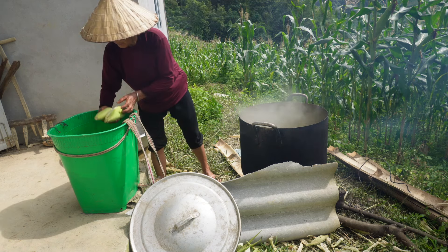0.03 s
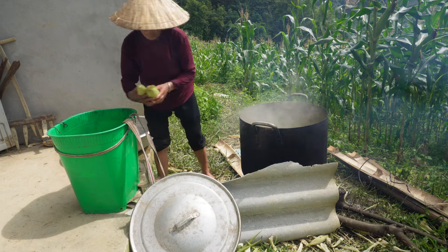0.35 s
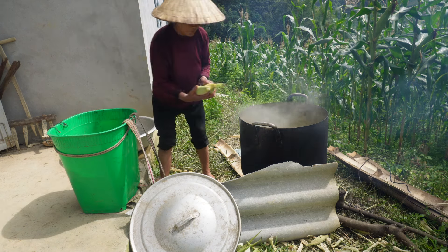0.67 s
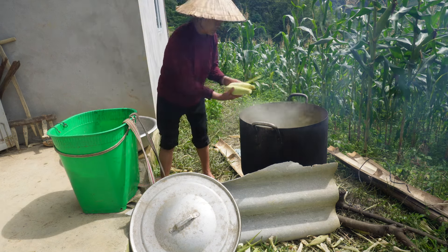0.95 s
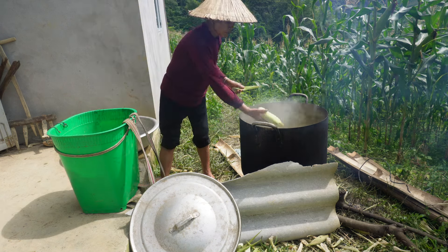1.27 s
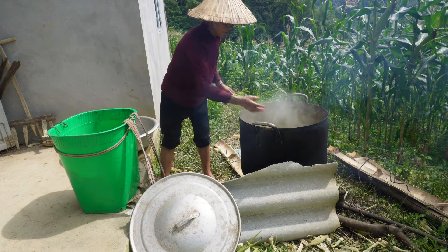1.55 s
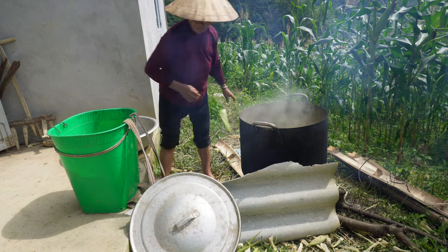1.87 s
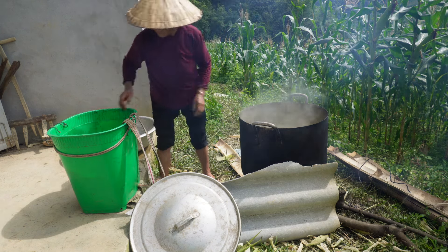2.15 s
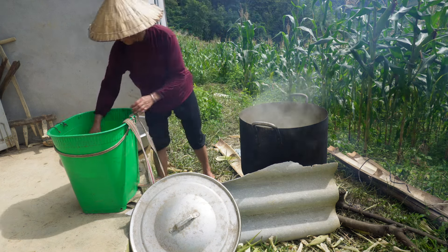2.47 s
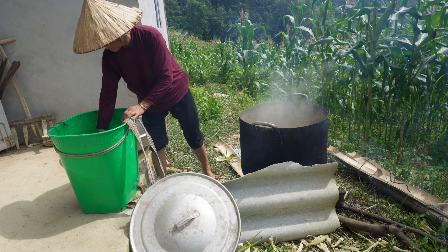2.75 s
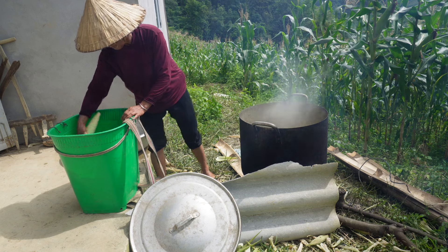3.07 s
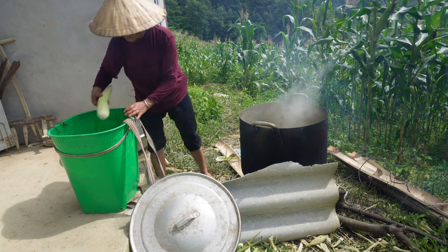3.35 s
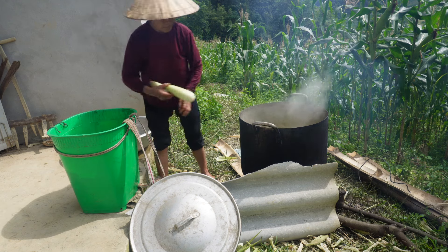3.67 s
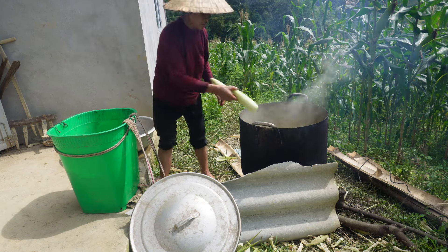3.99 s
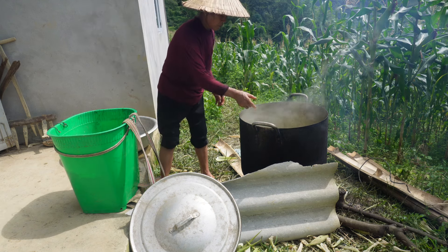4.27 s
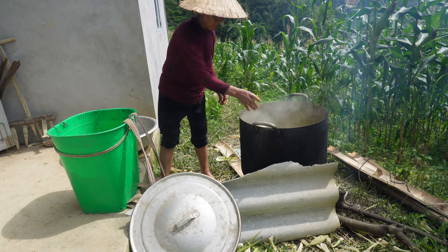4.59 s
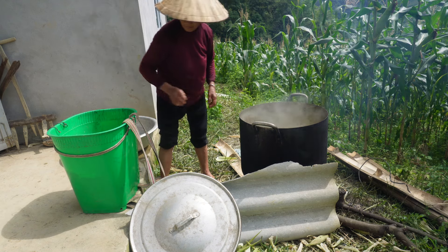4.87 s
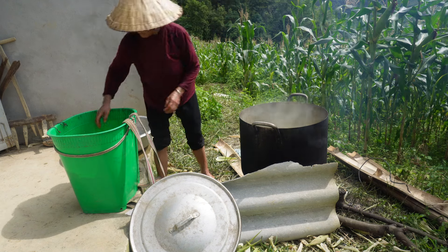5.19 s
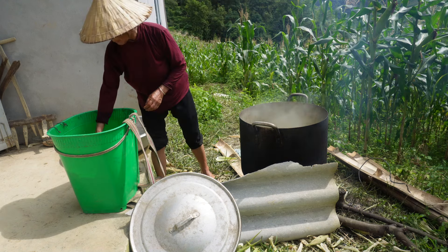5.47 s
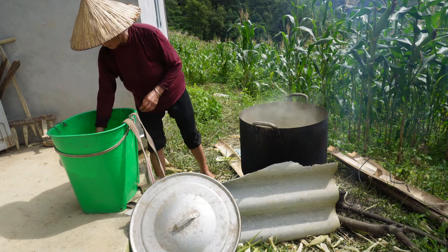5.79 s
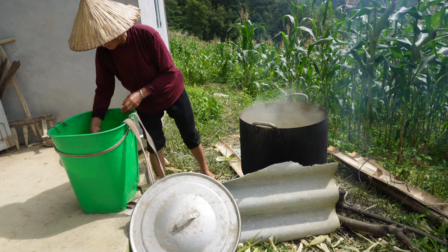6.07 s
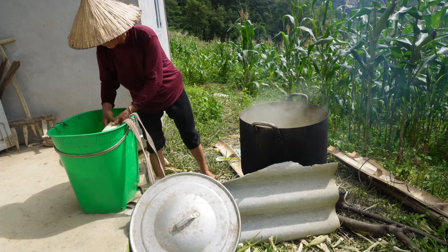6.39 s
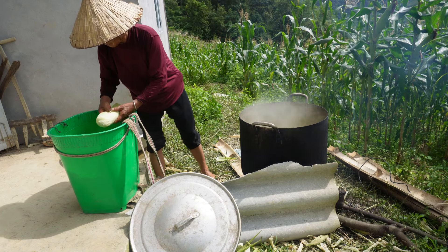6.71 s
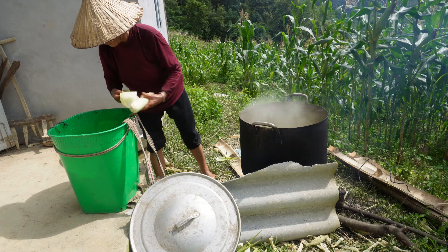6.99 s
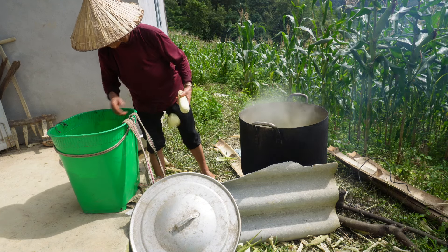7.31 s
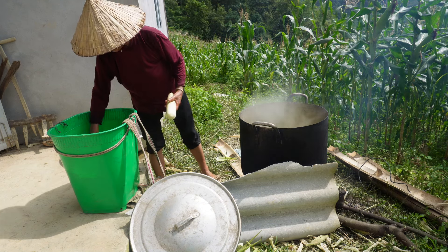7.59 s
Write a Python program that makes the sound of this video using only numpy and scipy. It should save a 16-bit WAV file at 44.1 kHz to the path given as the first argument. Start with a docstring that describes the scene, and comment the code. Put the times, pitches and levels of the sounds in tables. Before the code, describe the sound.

Beside a maize field, insects whine and chirp faintly over a soft, steady hiss of leaves, fire and simmering water. Close by, corn ears splash into a large pot in two quick groups, with a metal knock and a wooden clack between them. Afterwards more ears knock around in a plastic bucket, their husks rustling, and stalks crack and tear, loudest near the end.

```python
"""Ears of corn plunge into a big pot of hot water: smack, spray, bubbles, a gulp, a boom of the pot's
air and knocks on its metal. They come from a plastic bucket that thuds and clicks; husks rub and
crinkle, stalks crack and tear, and a loose board clacks. Behind are a steady hiss of leaves, fire and
simmering water, and insects whining and chirping in a maize field. A house wall echoes the near sounds."""
import sys
import numpy as np
from scipy import signal
from scipy.fft import rfft, irfft, next_fast_len
from scipy.io import wavfile

SR = 44100
rng = np.random.default_rng(int(sys.argv[2]) if len(sys.argv) > 2 else 0)


def store_pcm(level_fs):
    """Save levels as 16-bit WAV."""
    pcm = np.round(np.clip(level_fs, -1, 1) * 32767).astype(np.int16)
    wavfile.write(sys.argv[1], SR, np.atleast_2d(pcm).T)


N = 337385
TIME_S = np.arange(N) / SR
SIDES = np.array([[1], [-1]])   # left, right


def from_db(db):
    """Decibels to gain."""
    return 10 ** (np.asarray(db) / 20)


def unit_rms(x):
    """Scale to rms 1."""
    return x / np.sqrt(np.mean(x ** 2) + 1e-20)


def curves(rows):
    """One piecewise-linear curve per column after the time."""
    times_s, *columns = np.transpose(rows)
    return [np.interp(TIME_S, times_s, column) for column in columns]


def drift(per_s):
    """Random curve, rms 1, with per_s new values a second."""
    return unit_rms(np.interp(TIME_S * per_s, np.arange(30000), rng.standard_normal(30000)))


def grit(grain_db, per_s):
    """Noise in tiny clumps of uneven size, rms 1."""
    return unit_rms(rng.standard_normal(N) * from_db(grain_db * np.clip(drift(per_s), -2, 2)))


def cut(x, hz, kind, order=2):
    """Butterworth low- or high-pass."""
    sos = signal.butter(order, np.clip(hz, 10, .45 * SR), kind, fs=SR, output="sos")
    return signal.sosfilt(sos, x + 1e-18)


def resonate(x, hz, width_hz):
    """One resonance; keeps the power of white noise."""
    b, a = signal.iirpeak(min(hz, .45 * SR), hz / min(width_hz, SR / 3), fs=SR)
    return signal.lfilter(b, a, x + 1e-18) / np.sqrt(b[0])


def body(x, modes):
    """Parallel resonances of alternating sign."""
    weights = [from_db(db) * np.sqrt(width) * (-1) ** k for k, (_, width, db) in enumerate(modes)]
    weights = np.array(weights) / np.linalg.norm(weights)
    return sum(weight * resonate(x, hz, width) for weight, (hz, width, _) in zip(weights, modes))


def colour(x, spectrum, size=4096):
    """Minimum-phase filter of the given spectrum; keeps the power of white noise."""
    hz, db = np.transpose(spectrum)
    grid_hz = np.maximum(np.arange(size // 2 + 1) * SR / size, 1)
    gain = from_db(np.interp(np.log(grid_hz), np.log(hz), db))
    cepstrum = irfft(np.log(gain))
    cepstrum[1:size // 2] *= 2
    response = irfft(np.exp(rfft(cepstrum[:size // 2], size)))
    return signal.fftconvolve(x, response / np.linalg.norm(response))[:N]


def swell(s, rise_s, t60_s, db):
    """Envelope: exponential rise to a peak at time s, then decay."""
    span = slice(max(int((s - 8 * rise_s) * SR), 0), int((s + 2 * t60_s) * SR))
    age_s, out = TIME_S[span] - s, np.zeros(N)
    out[span] = from_db(db) * np.exp(np.minimum(age_s / rise_s, -age_s * np.log(1000) / t60_s))
    return out


def bell_curves(rows, half_s):
    """One Gaussian envelope per row."""
    out = np.zeros(N)
    for s, db in rows:
        span = slice(max(int((s - 3 * half_s) * SR), 0), int((s + 3 * half_s) * SR))
        out[span] += from_db(db) * np.exp(-((TIME_S[span] - s) / half_s) ** 2)
    return out


def clicks(rows):
    """One impulse per row."""
    out = np.zeros(N)
    for s, db in rows:
        out[round(s * SR)] += from_db(db)
    return out


def strokes(rows, source, shape):
    """Each row (s, rise_s, t60_s, db, hz) swells the source and filters it by shape(x, hz)."""
    out = np.zeros(N)
    for *stroke, hz in rows:
        envelope = swell(*stroke)
        on = envelope > 0
        out[on] += shape(source[on] * envelope[on], hz)
    return out


def hollow_notes(rows, waver, churn, sharp=0, settle_s=0.014):
    """Air resonances: wavering damped sines plus churning noise, optionally sharp around the peak."""
    wobble = 1 + waver * drift(70)
    noise = rng.standard_normal(N)
    notes = np.zeros(N)
    for s, hz, rise_s, t60_s, db in rows:
        envelope = swell(s, rise_s, t60_s, db)
        on = envelope > 0
        pitch_hz = hz * wobble[on] * (1 + sharp * np.exp(-np.abs(TIME_S[on] - s) / settle_s))
        tone = np.sqrt(2) * np.sin(2 * np.pi * np.cumsum(pitch_hz) / SR)
        rough = cut(resonate(noise[on], hz, 0.53 * hz), 0.51 * hz, "high")
        notes[on] += envelope[on] * (tone + churn * rough)
    return notes


def widen(mid, side, above_hz, side_db):
    """Stereo: alike in the bass, different in the treble."""
    return mid + from_db(side_db) * cut(side, above_hz, "high", order=1) * SIDES


def yard(x, t60_s, tail_db, wall_s, wall_db, dull_hz, left_lead_samples, side_db):
    """Direct sound, a smeared wall echo and a thin tail from the plants, which scatter little bass."""
    age_s = TIME_S[:SR // 2]
    scatter = rng.standard_normal((2, len(age_s)))
    tail = scatter * np.exp(-age_s * np.log(1000) / t60_s) * (age_s > .004)
    tail = cut(tail, dull_hz, "low", order=1)
    echo = scatter * np.exp(-np.abs(age_s - wall_s) / 0.0015)
    tail *= from_db(tail_db) / np.linalg.norm(tail[0])
    echo *= from_db(wall_db) / np.linalg.norm(echo[0])
    mid, side = tail + echo
    response = cut(widen(mid, side, above_hz=4300, side_db=side_db), 370, "high", order=1)
    size = next_fast_len(N + SR // 10, real=True)
    shift = np.exp(1j * np.pi * left_lead_samples * np.arange(size // 2 + 1) / size * SIDES)
    direct = irfft(rfft(x, size) * shift, size)[:, :N]
    return direct + signal.fftconvolve(x[None], response, axes=1)[:, :N]


# hiss spectrum (frequency [Hz], relative density [dB])
HISS_SPECTRUM = [(30, -44), (100, -27), (180, -22), (420, -12), (620, -7.5), (900, -2), (1700, -4),
                 (3700, -4), (4900, -5), (6600, -8.5), (8200, -6), (9400, -14), (11200, -13.5),
                 (12500, -18), (16000, -20.5)]


def hiss(level_db=-57):
    """Even noise of leaves, fire and simmering water."""
    mid, side = (colour(grit(grain_db=1.0, per_s=95), HISS_SPECTRUM) for _ in range(2))
    return from_db(level_db + .5 * drift(2)) * unit_rms(widen(mid, side, above_hz=360, side_db=-5.5))


def insect_band(hz, width_hz):
    """Far stereo buzz: random flutter blurs a pitch into a band; rms 1."""
    phase = 2 * np.pi * np.cumsum(hz * np.ones(N)) / SR
    flutter_per_s = 1.5 * width_hz
    mid, side = (drift(flutter_per_s) * np.cos(phase) + drift(flutter_per_s) * np.sin(phase)
                 for _ in range(2))
    return unit_rms(widen(mid, side, above_hz=2000, side_db=-5))


# cicada whine (time [s], pitch [Hz], level [dB])
CICADA_WHINE = [(0, 8240, -67), (1.5, 8210, -67), (2.5, 8150, -71.5), (3.5, 8590, -63.5), (4.1, 8590, -60),
                (5.6, 8690, -61), (6.5, 8720, -62), (7.65, 8570, -62)]


def cicada(throb_hz=67, throb_depth=0.5):
    """A narrow throbbing whine over a broader, lower band."""
    hz, db = curves(CICADA_WHINE)
    rate_hz = throb_hz * (1 + 0.0029 * drift(5))
    throb = 1 + throb_depth * np.cos(2 * np.pi * np.cumsum(rate_hz) / SR)
    return from_db(db) * (throb * insect_band(hz, 120) + from_db(-6) * insect_band(hz - 300, 800))


# cricket loudness (time [s], level [dB])
CRICKET_LEVELS = [(0, -60), (.14, -60), (.3, -69), (.75, -72), (1.3, -67.5), (2.2, -74), (3.3, -68),
                  (3.8, -70), (7.65, -72)]


def bush_cricket(pulses_per_s=16.6):
    """Fast, slightly uneven pulses in two very high bands."""
    uneven_s = TIME_S - .012 + 0.0031 * drift(6)
    pulses = np.cos(np.pi * pulses_per_s * uneven_s) ** 2 * from_db(0.74 * drift(4.3))
    buzz = insect_band(10920, 880) + from_db(2) * insect_band(9600, 900)
    return from_db(curves(CRICKET_LEVELS)[0]) * pulses * buzz


# far insect whistles (time [s], level [dB])
WHISTLE_CALLS = [(.62, -60.5), (1.46, -62), (3.66, -58.5), (5.54, -61), (6.27, -58.5)]


def whistles():
    """Thin narrow-band calls that fade in and out."""
    return bell_curves(WHISTLE_CALLS, half_s=0.08) * insect_band(hz=4950, width_hz=160)


# far insect chirps (time [s], level [dB])
CHIRP_CALLS = [(.235, -50), (.537, -47.5), (0.863, -47.5), (1.18, -52), (2.33, -49), (2.52, -52),
               (2.76, -54.5), (3.0, -47.5), (3.35, -54.5), (3.545, -46), (4.548, -37.5), (5.03, -43),
               (6.87, -48), (7.17, -46)]


def chirps():
    """Short rasps: a fluttering band with a pitched core."""
    flutter = from_db(-2 + drift(120))
    rasp = insect_band(4365, 800) + from_db(-7.5) * insect_band(4500, 220)
    return bell_curves(CHIRP_CALLS, half_s=0.042) * flutter * rasp


# board clacks (time [s], rise [s], t60 [s], level [dB])
BOARD_CLACKS = [(2.084, 0.001, 0.038, -25), (2.1, 0.0038, 0.16, -37.5), (2.146, .0005, 0.0075, -25)]
# board modes (frequency [Hz], width [Hz], relative gain [dB])
BOARD_MODES = [(1900, 260, 0.5), (2780, 260, 6.5), (3170, 370, -1), (4300, 440, -2), (6200, 300, -11),
               (6900, 630, -9.5)]


def board():
    """A light slat claps down and bounces."""
    contact = grit(grain_db=5.0, per_s=1100) * sum(swell(*clack) for clack in BOARD_CLACKS)
    return cut(body(contact, BOARD_MODES), 1100, "high")


# husk rubs (time [s], rise [s], level [dB], centre [Hz], tip crinkle [dB])
HUSK_RUBS = [(.675, 0.028, -49, 3600, -72), (1.0, 0.088, -57, 2920, -59), (1.111, 0.0036, -52.5, 4870, -60),
             (3.0, 0.091, -57, 2280, -77), (3.09, 0.032, -47, 2530, -40), (3.852, 0.008, -44, 2300, -40),
             (4.86, 0.22, -49, 2800, -49.5), (5.414, 0.13, -49.5, 1760, -43.5),
             (5.558, 0.018, -46.5, 1840, -56), (5.765, .002, -52, 2230, -74), (5.97, 0.038, -45, 2600, -71),
             (6.117, 0.041, -34, 2300, -32), (6.31, 0.044, -54, 2780, -55), (6.518, 0.0014, -51, 1350, -79),
             (6.745, 0.015, -38, 4460, -62), (6.92, .015, -45, 5600, -50), (7.03, 0.27, -50, 4300, -42.5),
             (7.598, 0.0026, -40.5, 2300, -38)]
# husk-on-husk spectrum (frequency [Hz], relative gain [dB])
HUSK_SPECTRUM = [(500, -3), (1000, 0.5), (1500, 2), (2300, 1.5), (3300, 1), (4300, 1), (5700, 1.5),
                 (7500, -1.5), (15000, -11)]


def husks(cracks_per_s=370):
    """Ribbed leaves slip in fine grains; their dry tips crackle higher and longer."""
    slips, flexing = [], 0
    for s, rise_s, db, hz, crinkle_db in HUSK_RUBS:
        t60_s = 0.17 + 2.25 * rise_s   # slow strokes die slowly
        slips.append((s, rise_s, t60_s, db, hz))
        flexing += swell(s, rise_s, 1.78 * t60_s, crinkle_db)
    friction = grit(grain_db=3.0, per_s=500)
    rubs = strokes(slips, friction, lambda x, hz: cut(resonate(x, hz, 0.83 * hz), 0.093 * hz, "high"))
    tips = unit_rms((rng.random(N) < cracks_per_s / SR) * rng.standard_normal(N))
    crinkle = (1.22 * grit(grain_db=2.5, per_s=850) + 0.88 * tips) * flexing
    return colour(rubs, HUSK_SPECTRUM) + from_db(-6.5) * cut(crinkle, 5100, "high")


# stalk breaks (time [s], thin fibres [dB], thick core [dB], tear [dB])
STALK_SNAPS = [(3.954, -36.5, -45, -47), (4.143, -40, -58, -74), (5.168, -43, -61, -60),
               (5.213, -18.5, -40, -43), (5.3651, -22.5, -55, -50), (6.045, -30.5, -56, -47),
               (6.223, -42, -52, -72), (6.274, -35, -51, -72), (6.318, -38, -56, -68),
               (6.8935, -16, -15, -44), (7.2616, -7.5, -1.5, -19.5)]


def stalks(fibre_hz=13200, core_hz=7050, tear_hz=7230, cob_knock_hz=1090, cob_tear_hz=2600):
    """Fibres and core crack together, then tear; the cob passes on crack and tear, lower down."""
    breaks, knocks = [], []
    for s, fibre_db, core_db, tear_db in STALK_SNAPS:
        fibre = (s, 0.00045, 0.016)   # (time [s], rise [s], t60 [s])
        core = (s, 0.0001, 0.015)
        tear = (s + 0.029, 0.016, 0.1)
        breaks += [(*fibre, fibre_db, fibre_hz), (*core, core_db, core_hz), (*tear, tear_db, tear_hz)]
        knocks += [(*core, 2 * core_db - 15.5, cob_knock_hz), (*tear, tear_db - 11, cob_tear_hz)]
    crackle = grit(grain_db=4.5, per_s=1700)
    cracks = strokes(breaks, crackle, lambda x, hz: resonate(x, hz, 0.25 * hz) + from_db(-7.5) * x)
    cob = strokes(knocks, crackle, lambda x, hz: resonate(x, hz, 2.2 * hz))
    return cut(cracks, 5180, "high", order=6) + cut(cob, 260, "high")


# ears rubbing and landing in the bucket (time [s], rise [s], relative level [dB], centre [Hz])
BUCKET_THUDS = [(2.872, 0.0026, -60, 420), (5.386, .021, -45, 490), (5.57, .027, -51.5, 537),
                (6.129, 0.032, -35.5, 615), (6.229, .012, -49.5, 474), (6.285, .004, -37, 250),
                (7.172, 0.069, -47, 438), (7.249, .02, -45, 376), (7.31, 0.048, -33.5, 427)]
# wall and air modes (frequency [Hz], width [Hz], relative gain [dB])
BUCKET_MODES = [(172, 9, 1.5), (373, 140, 0.5), (426, 140, 2), (760, 123, -1.5), (866, 190, 1),
                (1410, 630, 3)]


def bucket_thuds(wall_t60_s=0.25, air_hz=180, air_t60_s=0.095):
    """Soft ears drum on the plastic wall and wake the air inside."""
    def soft_touch(x, hz):
        return cut(resonate(x, hz, 0.64 * hz) * np.sqrt(hz / SR), 2.5 * hz, "low")

    wall = unit_rms(body(grit(grain_db=1.5, per_s=190), BUCKET_MODES))
    pushes = [(s, rise_s, wall_t60_s, db + 12, hz) for s, rise_s, db, hz in BUCKET_THUDS]
    notes = [(s, air_hz, rise_s, air_t60_s, db - 22) for s, rise_s, db, _ in BUCKET_THUDS]
    # an ear pulled out bumps along the wall, ever lower and softer
    bumps = [(3.193 + k * .057, 215.3 - k * 5.47, 0.023, 0.086, -50 - k * 3) for k in range(6)]
    air = hollow_notes(notes + bumps, waver=0.081, churn=0.43)
    return strokes(pushes, wall, soft_touch) + cut(air, 630, "low")


# taps on the bucket (time [s], level [dB])
BUCKET_TAPS = [(5.451, -22), (5.474, -25), (5.949, -10), (5.963, -13), (5.981, -13), (6.0435, -29),
               (6.0825, 4), (6.518, -22), (6.948, -14)]
# stiff wall modes (frequency [Hz], width [Hz], relative gain [dB])
PLASTIC_MODES = [(1350, 360, 0.5), (2300, 310, 3), (3200, 180, 9), (4040, 380, 6.5), (5300, 1000, -2),
                 (9000, 2200, -13)]


def bucket_taps():
    """Hard ends of the ears click on the quickly damped plastic."""
    return body(clicks(BUCKET_TAPS), PLASTIC_MODES)


# knocks on the pot (time [s], rise [s], t60 [s], relative level [dB], centre [Hz])
POT_KNOCKS = [(1.8186, 0.0016, 0.04, -10.5, 3350), (1.831, 0.0019, 0.12, -14, 4500),
              (1.857, 0.0089, 0.41, -31.5, 1800)]
# pot modes (frequency [Hz], width [Hz], relative gain [dB])
POT_MODES = [(820, 2700, -15), (1470, 180, -5), (1720, 280, -10.5), (2430, 530, -5), (2960, 140, -3),
             (3260, 360, -3.5), (3850, 140, 3.5), (4240, 66, 6), (4560, 130, 1.5), (5050, 510, -6.5),
             (7000, 520, -5.5), (9150, 180, -7), (11350, 1100, -14.5)]


def pot():
    """Short noisy contacts ring the water-damped metal."""
    contact = grit(grain_db=0.0, per_s=950)
    knocks = sum(resonate(contact * swell(*stroke), hz, 1.5 * hz) for *stroke, hz in POT_KNOCKS)
    return from_db(-5.5) * body(knocks, POT_MODES)


def bubbles(per_s, low_hz, high_hz, cycles, sizes=13):
    """Bubbles of random size, each ringing for some cycles; rms 1."""
    births = (rng.random(N) < per_s / SR) * rng.standard_normal(N)
    size = rng.integers(0, sizes, N)
    pitches_hz = np.geomspace(low_hz, high_hz, sizes)
    rings = (resonate(births * (size == k), hz, 2 * hz / cycles) for k, hz in enumerate(pitches_hz))
    return unit_rms(sum(rings))


# ears hitting the water (time [s], rise [s], splash [dB], smack [dB], high-pass [Hz], spray t60 [s],
# froth [dB], gulp [dB], boom [dB])
EAR_PLUNGES = [(1.533, 0.00059, -21, -16, 1230, 0.4, -42, -55, -41),
               (1.6035, .006, -18, -5.5, 500, 0.2, -28, -39, -57),
               (1.667, .001, -21, 1, 500, 0.5, -41, -40.5, -52),
               (4.2939, .0008, -41, -8.5, 1800, .1, -50, -64, -47),
               (4.303, .001, -29, -21, 1200, 0.52, -35.5, -61, -60),
               (4.3847, 0.0046, -14.5, 4.5, 600, 0.24, -42.5, -28, -48),
               (4.736, 0.0031, -11.5, 2, 1780, 0.18, -46.5, -45.5, -46)]
# single large bubbles (time [s], pitch [Hz], level [dB])
LARGE_BUBBLES = [(4.312, 1900, -26.5), (4.333, 1363, -31.5), (4.342, 490, -37.5)]
# splash spectrum (frequency [Hz], relative density [dB])
SPLASH_SPECTRUM = [(100, -9), (250, -19.5), (620, -22), (1000, -11.5), (1700, -9.5), (2500, -4),
                   (3400, -4.5), (4800, -4.5), (6500, -9.5), (10000, -15), (15500, -20.5)]


def plunges(gulp_hz=470, boom_hz=187, slosh_hz=192.2, blip_cycles=63):
    """Each ear smacks the surface, throws spray, drags down bubbles and makes the pot's air boom."""
    smacks, sprays, gulps, booms, sloshes, cloud = [], [], [], [], [], 0
    for s, rise_s, db, smack_db, highpass_hz, spray_t60_s, froth_db, gulp_db, boom_db in EAR_PLUNGES:
        smacks.append((s, smack_db))
        sprays.append((s, rise_s, 0.036, db, highpass_hz))   # first sheet of water
        sprays.append((s + 0.0071, 0.0074, spray_t60_s, db - 8.5, highpass_hz))   # droplets fall back
        gulps.append((s + .015, gulp_hz, .014, 0.12, gulp_db))   # cavity closes
        booms.append((s + 0.0031, boom_hz, 0.00293, 0.21, boom_db))
        sloshes.append((s + 0.077, slosh_hz, .025, .45, boom_db - 2))   # water swings back
        cloud += swell(s + 0.047, rise_s=0.024, t60_s=0.15, db=froth_db)
    blips = [(s, hz, 0.0037, blip_cycles / hz, db) for s, hz, db in LARGE_BUBBLES]
    droplets = grit(grain_db=2.5, per_s=900)
    spray = strokes(sprays, droplets, lambda x, hz: cut(x, hz, "high", order=1))
    splash = colour(cut(spray + clicks(smacks), 110, "high", order=1), SPLASH_SPECTRUM)
    froth = bubbles(per_s=990, low_hz=800, high_hz=2400, cycles=23) * cloud
    gulp = hollow_notes(gulps + blips, waver=0.0336, churn=0.44)
    boom = hollow_notes(booms, waver=0.076, churn=.8, sharp=0.31)
    slosh = hollow_notes(sloshes, waver=0.057, churn=0.43)
    return splash + froth + gulp + boom + slosh


# stereo balance (time [s], left minus right [dB])
BALANCE = [(0, 0.6), (3.3, 1.2), (4.2, 0.6), (5.2, 0.3), (5.8, -0.6), (6.8, 0.5), (7.3, 1)]


def scene():
    """Pot slightly left, handled ears slightly right, insects and hiss all round."""
    at_pot = yard(plunges() + pot() + board(), t60_s=0.29, tail_db=-14, wall_s=0.016, wall_db=-18,
                  dull_hz=4500, left_lead_samples=0.6, side_db=0)
    handled = husks() + stalks() + bucket_thuds() + bucket_taps()
    at_bucket = yard(handled, t60_s=0.21, tail_db=-13, wall_s=0.02, wall_db=-22,
                     dull_hz=8000, left_lead_samples=-0.66, side_db=3.5)
    at_bucket *= from_db(0.05 * SIDES / 2)
    insects = cicada() + chirps() + whistles() + bush_cricket()
    balance = from_db(curves(BALANCE)[0] * SIDES / 2)
    return (at_pot + at_bucket + insects + hiss()) * balance


def record(dry, highpass_hz=100, lowpass_hz=16000):
    """Round the highest peaks, thin the deep bass, cut the top."""
    rounded = 1.304 * np.tanh(dry / 1.284)
    lowpass = signal.ellip(10, .1, 70, lowpass_hz, fs=SR, output="sos")
    return signal.sosfilt(lowpass, cut(rounded, highpass_hz, "high"))


dry = scene()
out = record(dry)
store_pcm(out)
```